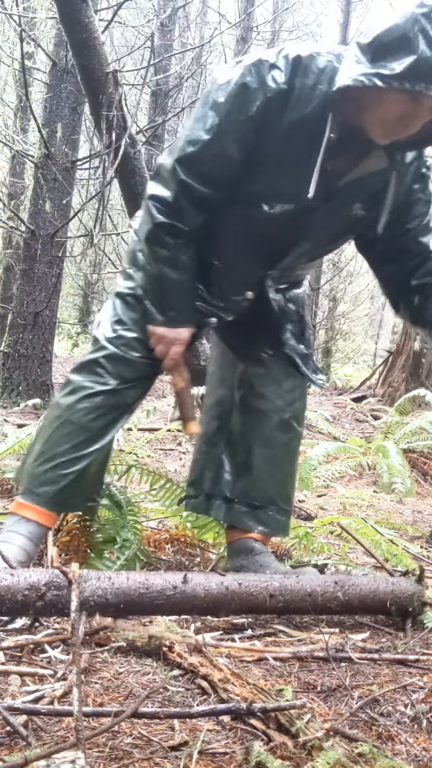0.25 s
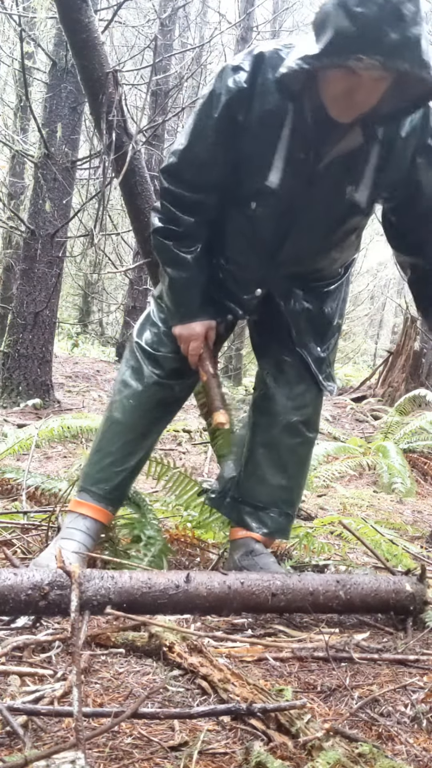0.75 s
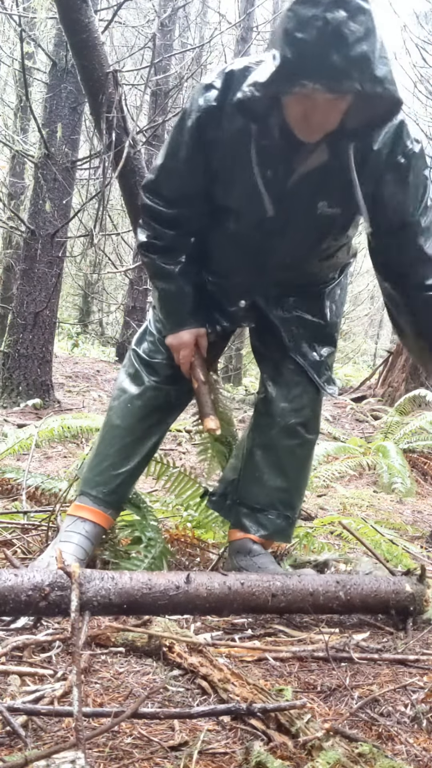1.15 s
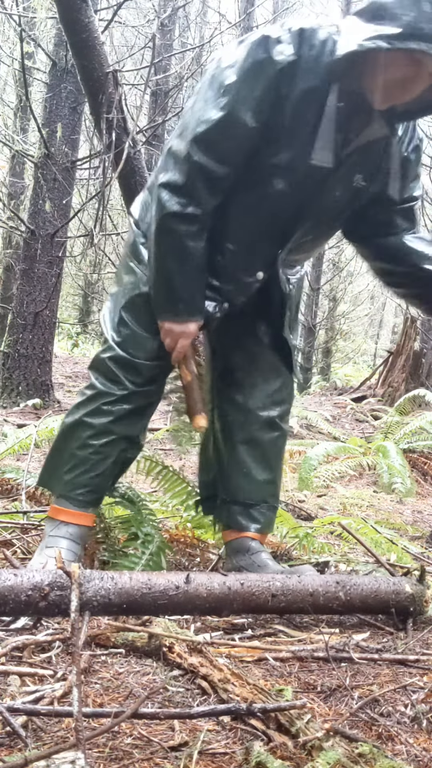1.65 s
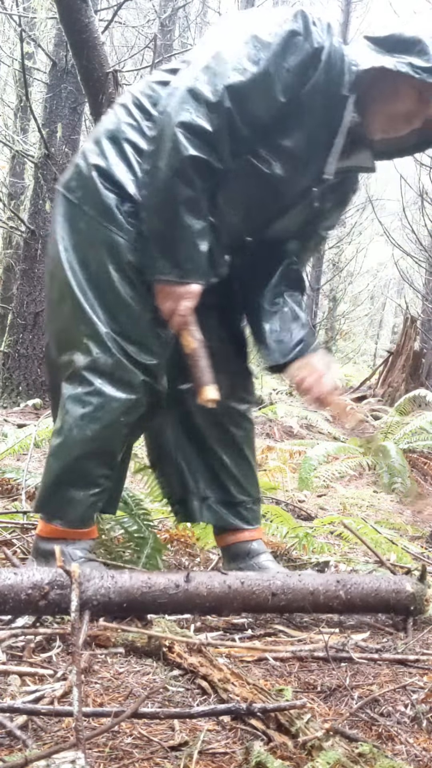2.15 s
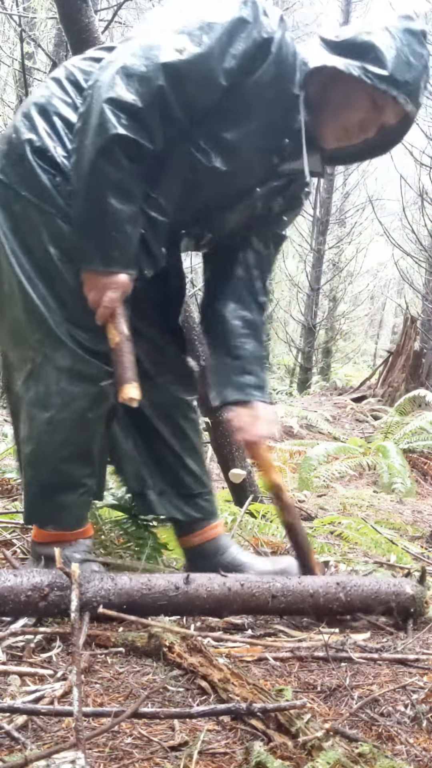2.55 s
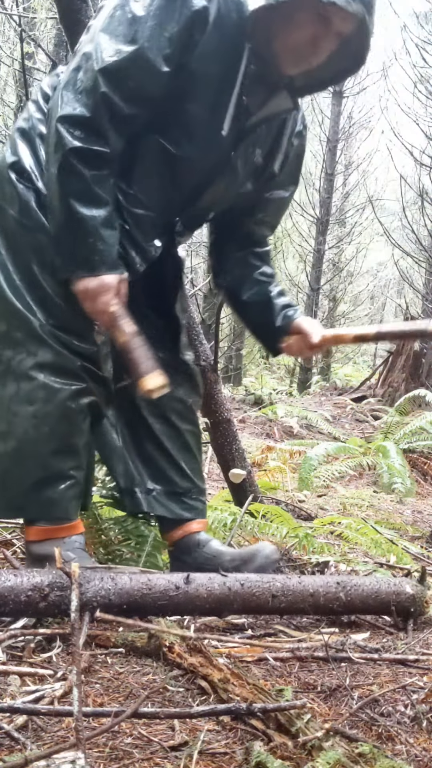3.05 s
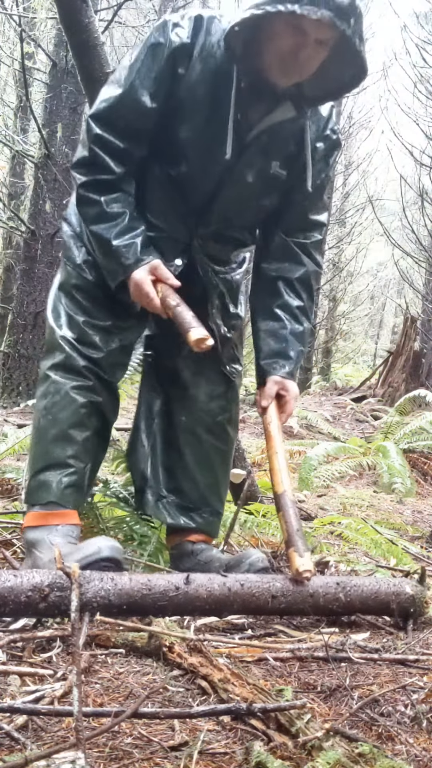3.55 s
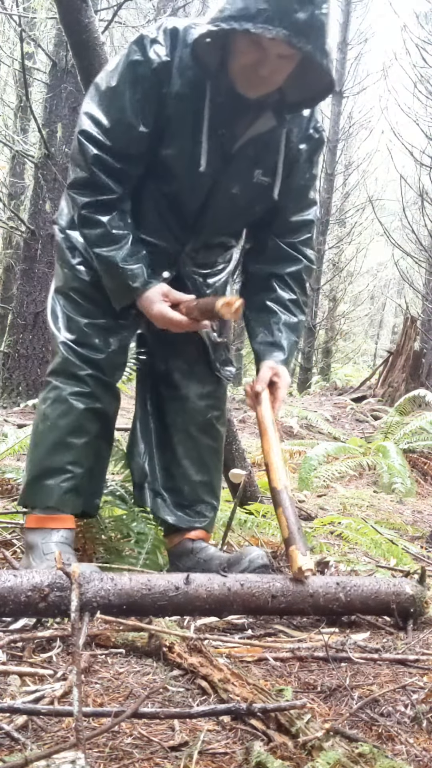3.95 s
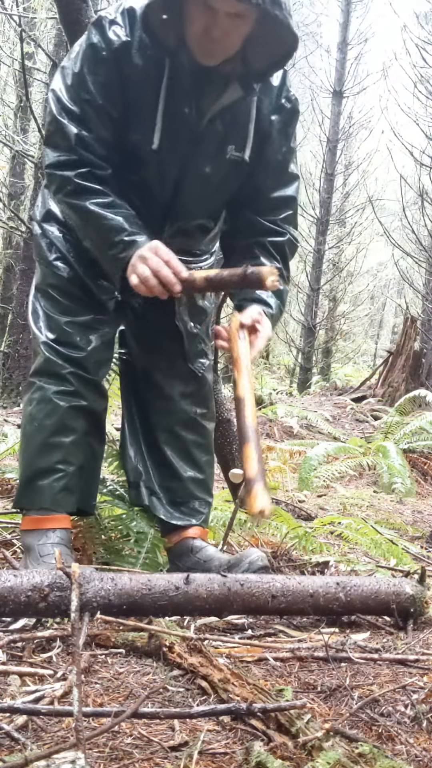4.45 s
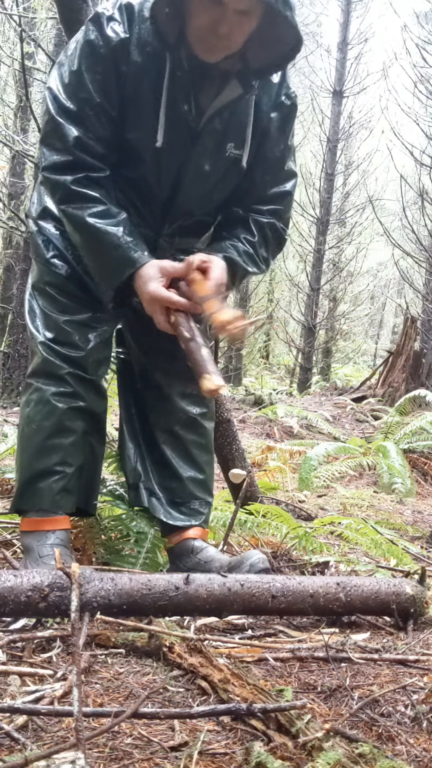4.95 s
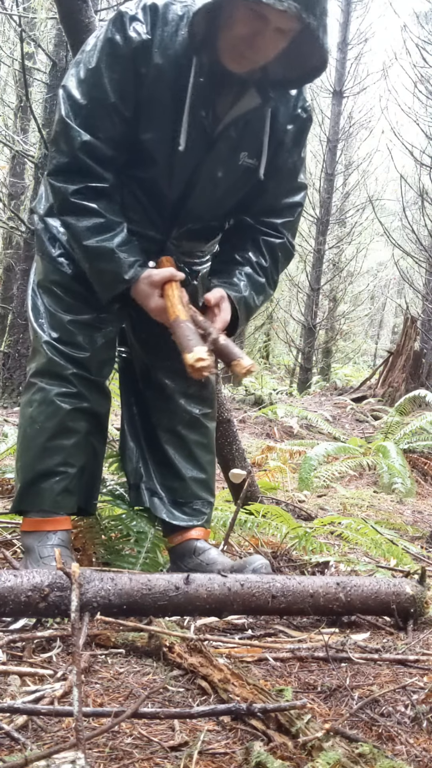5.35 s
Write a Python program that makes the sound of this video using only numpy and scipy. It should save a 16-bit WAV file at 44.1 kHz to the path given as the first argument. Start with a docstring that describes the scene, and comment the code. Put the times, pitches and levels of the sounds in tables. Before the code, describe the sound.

Six wood-on-wood hits, dry and abrupt, with gritty bark crunch, a low thud and a very short hollow ring. The third and fifth are brightest, the fourth duller, the last faint. Between and after them come waterproof fabric rustle, needle litter, twig clicks and small stick bumps over a barely audible low hush. Close outdoor stereo, the right side muffled.

```python
"""In a quiet forest a wooden baton strikes a fallen log: it touches, slams and rebounds.
Noise bursts give the bark crunch, knock and ground thud; damped modes ring the stick and the hollow log.
A rain jacket and needle litter rustle as shaped noise, twigs tick, and boots and sticks bump softly.
The trunks scatter a faint tail, swings shove air at the microphone, and a low hush lies underneath.
The right microphone port is muffled, so nearly all the treble sits on the left."""
import sys
import numpy as np
from scipy import signal
from scipy.fft import rfft, irfft, next_fast_len
from scipy.io import wavfile
from scipy.ndimage import map_coordinates

SR = 44100
rng = np.random.default_rng(int(sys.argv[2]) if len(sys.argv) > 2 else 0)


def store_wav(level_fs):
    """Save 16-bit WAV to argv[1]."""
    pcm = np.round(np.clip(np.atleast_2d(level_fs), -1, 1) * 32767)
    wavfile.write(sys.argv[1], SR, pcm.T.astype(np.int16))


N = 246519  # samples

# Blows on the log: [t/s, place along the log/0-1, ring level/dB, ground thud level/dB, knock level/dB,
#   knock centre f/Hz, bark crunch level/dB, t until the bark gives way/s, crush t/s, crunch tilt/dB per octave,
#   first touch level/dB against the slam, rebound level/dB against the slam]
BLOWS = [(0.0508, .498, -13.5, -36, -11.5, 820, -16, .0006, 0.0043, -0.8, -33, -24.5),
         (0.6454, .318, -17, -28, -16, 930, -14.5, .0025, 0.0029, 5.5, -15, -17),
         (1.2092, .26, -17, -28.5, -6.5, 1200, -11, .0006, 0.0032, 1.35, -7, -33.5),
         (2.1836, .322, -23.5, -26, -25, 483, -27, .0001, 0.0019, -3.5, 1, -37),
         (2.6681, .486, -23.5, -25, -25, 2400, -7.5, 0.00014, .0031, -0.53, 0.5, -36),
         (3.616, .236, -20.5, -39.5, -34.5, 566, -34.5, 0.00035, 0.0019, -3, -28, -28)]
# The hand-held baton's modes: [f/Hz, relative level/dB, t60/s]
BATON_MODES = [(709, -1, .055), (782, -6, .04), (977, 5, 0.03), (970, -1, 0.014), (1424, -5, 0.03),
               (1760, -3, 0.03), (2620, 1, 0.015), (2957, 3, .045), (3114, 2, 0.045)]
# Colour of the crunching bark before each blow's tilt: [f/Hz, relative level/dB per Hz]
BARK_COLOUR = [(200, -21), (1200, -1.5), (1800, -1), (3000, 0.5), (4200, 0.5), (5000, -5.5), (6000, -1),
               (8000, -3), (10000, -1.5), (13000, -3.5), (16000, -8.5)]
# The log's bending modes: [f/Hz, relative level/dB, t60/s]
LOG_MODES = [(235, -15, 0.23), (323.7, -7, .18), (440.7, 2, 0.13), (569, -10.5, 0.1), (698, 2, 0.079),
             (808, -14.5, 0.087), (990, -15, 0.0077)]
# How long the far trunks answer: [f/Hz, t60/s]
FOREST_DECAY = [(150, 0.37), (600, 0.12), (1500, 0.35), (3500, 0.58), (8000, 0.58), (16000, 1)]
# How busily the body moves, driving jacket, litter and faint snaps: [t/s, relative level/dB]
MOTION = [(0.0, -64.5), (1.73, -66.5), (2.05, -65), (2.63, -65.5), (2.8, -64.5), (3.41, -67), (5.59, -70)]
# Arm swings and steps, each a swell of rustle: [t at the top/s, length/s, jacket level/dB, needle litter level/dB]
SWELLS = [(0.67, 0.16, -57.5, -59), (1.983, 0.052, -56.5, -58), (2.09, 0.055, -49, -50.5),
          (2.808, 0.25, -53, -70), (3.189, 0.087, -57.5, -78), (3.98, 0.31, -61, -65.5)]
# Colour of the jacket: [f/Hz, relative level/dB per Hz]
JACKET_COLOUR = [(530, -30.5), (900, -4.5), (1200, -16.5), (1470, -4.5), (2020, -5), (4150, 0.5),
                 (4920, -5), (5750, 0), (8450, -7), (9420, -3.5), (12900, -4.5), (15100, -3), (16000, -11)]
# Colour of boots in needle litter: [f/Hz, relative level/dB per Hz]
LITTER_COLOUR = [(100, -4), (200, -4), (380, -1), (600, -5.5), (900, -15), (1400, -24.5), (3000, -35)]
# The clearest snaps of twigs and jacket creases:
#   [t/s, level/dB, relative body level/dB at 600-2200 Hz, sizzle setting/dB for the top treble]
CLEAR_TICKS = [(0.1945, -39, -22, -2), (0.3257, -49, -8, -1), (0.7103, -40, 0, -5), (0.9402, -40, -4, 1),
               (1.3712, -44, -12, 0), (1.603, -43, -6, 1), (1.952, -40.5, 0, 1), (2.0076, -37, -3, 4),
               (2.0388, -22.5, -5, 2), (2.1193, -39, -10, 5), (2.3854, -43, -6, 3), (3.2745, -43, -14, -9),
               (3.4031, -31, -14, 2), (3.6565, -40, -8, 3), (4.4146, -31.5, -22, -12), (4.6268, -46, -6, 1),
               (4.9172, -37.5, -6, 6), (5.0764, -46.5, -8, 5)]
# Boots and sticks bump: [t/s, level/dB, centre f/Hz]
BUMPS = [(0.974, -49, 94), (1.610, -43.5, 140), (1.931, -44.5, 392), (2.092, -43.5, 377),
         (2.107, -38.5, 280), (2.322, -46.5, 203), (3.121, -49, 298), (3.311, -51.5, 560),
         (3.403, -49, 550), (3.711, -45, 1760), (4.171, -40, 140), (4.194, -39.5, 502), (4.325, -50, 790),
         (4.338, -50.5, 111), (4.784, -40, 746), (4.826, -47.5, 1050)]
# Swings shove air at the microphone: [t/s, level/dB, sway f/Hz]
AIR_PUSHES = [(1.211, -26.5, 4), (1.572, -46, 5.9), (2.667, -14.5, 5.2), (3.313, -36, 5.2)]
# Colour of the still air: [f/Hz, relative level/dB per Hz]
AIR_COLOUR = [(20, -1.5), (45, -0.5), (90, -0.5), (135, -5), (200, -17), (500, -18), (1200, -28),
              (4000, -28.5), (9000, -40), (16000, -42.5)]
# The microphone housing cancels a narrow band: [f/Hz, level/dB]
HOUSING = [(900, -1), (1020, -6.5), (1200, -8.5), (1380, -2), (16000, -0.5)]
# The right port resonates near 1.2 kHz and is dull above: [f/Hz, level/dB against the left, phase lead/rad]
RIGHT_PORT = [(40, -2, 0), (150, -2, .9), (250, -4.5, 1.1), (450, -8, 1.55), (700, -6, 1), (1050, -2, .2),
              (1250, -2.5, -1.4), (1500, -4, -1.5), (2000, -14, -1.3), (3000, -20, -2), (4200, -26, -1.6),
              (6000, -33, -2), (9000, -48, -2), (16000, -53, -2)]

TOUCH_LEAD_S, TOUCH_HOLD_S = 0.003, .0015  # the bark is met just before the wood
REBOUND_S = .0156  # the baton hops once
# the soil goes on shaking after each blow, at SOIL_DB for the usual thud
SOIL_DELAY_S, SOIL_HZ, SOIL_T60_S = .045, 68, 0.5
SOIL_DB, SOIL_GROWS, USUAL_THUD_DB = -46.5, 0.8, -28  # grows in dB for each dB of thud above the usual
BUMP_CYCLES = 10.4  # t60 of a bump in cycles of its centre, so the low ones last longest
FAINT_BODY_DB, FAINT_SIZZLE_DB = -8, 0.5  # the colour that the lesser snaps share
FAINT_TICK_DB, FAINT_SPREAD_DB = 12.5, 2  # lesser snaps: level over the motion, random spread
CREASE_DB = 6  # level of a crease over a swing's jacket rustle
TOP_HZ = 16000  # band limit


def amp(db):
    """Decibels to amplitude."""
    return 10 ** (np.asarray(db) / 20)


def unit(x):
    """Scale a sound to rms 1."""
    return x / np.sqrt(np.mean(x ** 2) + 1e-20)


def along(points, hz):
    """Read a curve of (Hz, value) points on a log frequency axis."""
    f, v = np.transpose(points)
    return np.interp(np.log(hz + 1), np.log(f + 1), v)


def curve(rows):
    """Draw an automation line, one value per sample, through (s, value) rows."""
    return np.interp(np.arange(N) / SR, *np.transpose(rows))


def wobble(rate, size=N):
    """A smooth random curve, rate knots a second."""
    knots = rng.standard_normal(int(size * rate / SR) + 4)
    return map_coordinates(knots, [np.arange(size) * rate / SR])


def filtered(x, response):
    """Shape the spectrum of x by a response of frequency."""
    n = x.shape[-1]
    padded = next_fast_len(n + SR // 4)
    spectrum = rfft(x, padded) * response(np.fft.rfftfreq(padded, 1 / SR))
    return irfft(spectrum, padded)[..., :n]


def noise(colour_db, size):
    """Noise of rms 1 whose spectrum in dB is a function of frequency."""
    return unit(filtered(rng.standard_normal(size), lambda hz: amp(colour_db(hz))))


def hump(centre_hz, steep_db):
    """A broad resonance: the level falls with the square of the distance in octaves."""
    return lambda hz: -steep_db * np.log2((hz + 1) / centre_hz) ** 2


def burst(carrier, rise, hold, t60):
    """The carrier swells, holds and dies (times in s); its energy is set by the envelope alone."""
    t = np.arange(len(carrier)) / SR
    fade = amp(-60 * np.maximum(t - hold, 0) / t60)
    envelope = (1 - np.exp(-(t / rise) ** 2)) * fade
    return unit(carrier * envelope) * np.sqrt(np.mean(envelope ** 2))


def ringing(hz, db, t60, rise):
    """Damped modes of struck wood, each starting at its own random phase."""
    t = np.arange(SR // 2) / SR
    decay = amp(db[:, None] - 60 * t / t60[:, None])
    phase = 2 * np.pi * (hz[:, None] * t + rng.random((len(hz), 1)))
    modes = decay * np.sin(phase)
    return modes.sum(0) * (1 - np.exp(-t / rise))


def add(track, s, sound):
    """Mix a sound into the track at time s."""
    part = track[max(round(s * SR), 0):][:len(sound)]
    part += sound[:len(part)]


def baton(grain_db=0.5, pivot_hz=6000, clack_db=-3, modes_db=-4, light_tilt_db=-1.0):
    """Touch, slam and rebound: the baton knocks while the bark under it gives way in a dense crunch."""
    out, size = np.zeros(N), SR // 4
    hz, db, t60 = np.transpose(BATON_MODES)
    for s, _, _, _, knock_db, knock_hz, crunch_db, give, crush, tilt, touch_db, rebound_db in BLOWS:
        # the knock centre picks which modes speak
        drive = hump(knock_hz, steep_db=3.5)
        # lighter contacts only scuff the bark, at once and more dully
        light_tilt = tilt + light_tilt_db
        contacts = [(s - TOUCH_LEAD_S, touch_db, 0, TOUCH_HOLD_S, light_tilt),
                    (s, 0, give, crush, tilt),
                    (s + REBOUND_S, rebound_db, 0, crush, light_tilt)]
        for at, force_db, lag, hold, slope in contacts:
            stick_ring = ringing(hz, db + drive(hz), t60, rise=.0006)
            add(out, at, amp(force_db + knock_db + modes_db) * stick_ring)
            clack = burst(noise(drive, size), rise=0.0015, hold=hold, t60=0.021)
            add(out, at, amp(force_db + knock_db + clack_db) * clack)
            bark = noise(lambda f: along(BARK_COLOUR, f) + slope * np.log2((f + 100) / pivot_hz), size)
            fibres = amp(grain_db * wobble(1800, size))
            crunch = burst(bark * fibres, rise=0.0001, hold=hold, t60=0.024)
            add(out, at + lag, amp(force_db + crunch_db) * crunch)
    return out


def log_blows(first_order=5):
    """The log rings hollow; a mode with a node near the struck place stays weak."""
    out = np.zeros(N)
    hz, db, t60 = np.transpose(LOG_MODES)
    half_waves = first_order + np.arange(len(LOG_MODES)) + .5
    for s, place, ring_db, thud_db, *_ in BLOWS:
        mode_shape = np.cos(np.pi * half_waves * place + np.pi / 4)
        shape_db = 10 * np.log10(mode_shape ** 2 + .08)
        add(out, s, amp(ring_db) * ringing(hz, db + shape_db, t60, rise=0.004))
        # the ground under the log takes a dull share of the blow, then shakes on
        ground = noise(hump(centre_hz=232, steep_db=3.5), SR // 2)
        add(out, s, amp(thud_db) * burst(ground, rise=0.003, hold=0.004, t60=0.085))
        soil = noise(hump(SOIL_HZ, steep_db=10.5), SR // 2)
        soil_db = SOIL_DB + SOIL_GROWS * (thud_db - USUAL_THUD_DB)
        add(out, s + SOIL_DELAY_S, amp(soil_db) * burst(soil, rise=.007, hold=.0025, t60=SOIL_T60_S))
    return out


def forest(x, near_db=-17, near_t60=0.11, far_db=-22, far_rise=0.0065, block_size=13230):
    """Ground and near trunks scatter at once; farther trunks answer in a thin tail, redrawn every block."""
    out = np.zeros(N)
    onset = 1 - np.exp(-np.arange(SR // 2) / SR / far_rise)
    for start in range(0, N, block_size):
        # the far tail is noise that fades at its own pace in each band
        hz, t, bands = signal.stft(rng.standard_normal(SR // 2), SR, nperseg=256)
        fade = amp(-60 * t / along(FOREST_DECAY, hz)[:, None])
        far = signal.istft(bands * fade, SR, nperseg=256)[1][:SR // 2] * onset
        scatter = noise(lambda f: along([(300, -14), (1500, -1.5), (16000, 6.5)], f), SR // 2)
        near = burst(scatter, rise=0.0032, hold=0.0098, t60=near_t60)
        answer = amp(near_db) * near / np.linalg.norm(near) + amp(far_db) * far / np.linalg.norm(far)
        add(out, start / SR, signal.fftconvolve(x[start:start + block_size], answer))
    return out


def echoes(count=3):
    """The crack leaves in several directions, each with its own fine grain and its own trunks to meet."""
    return sum(forest(baton()) for _ in range(count)) / np.sqrt(count)


def rustle(jacket_db=6, litter_db=3, crinkle_db=2.0):
    """The jacket slides and crinkles while boots shift in needle litter; both swell with each swing or step."""
    crinkle = amp(crinkle_db * wobble(430) + 0.66 * wobble(25))
    cloth = noise(lambda hz: along(JACKET_COLOUR, hz), N) * crinkle
    needles = noise(lambda hz: along(LITTER_COLOUR, hz), N) * amp(1.8 * wobble(30))
    t, motion_db = np.arange(N) / SR, curve(MOTION)
    jacket = amp(motion_db + jacket_db)
    litter = amp(motion_db + litter_db)
    for s, length, swing_db, step_db in SWELLS:
        swell = np.exp(-2 * ((t - s) / length) ** 2)
        # levels add as powers
        jacket = np.hypot(jacket, amp(swing_db) * swell)
        litter = np.hypot(litter, amp(step_db) * swell)
    return jacket * unit(cloth) + litter * unit(needles)


def ticks(count=24):
    """Tiny dry snaps of coloured noise: clear ones, faint strays that follow the motion, creases in the swings."""
    out = np.zeros(N)
    times = rng.uniform(0, N / SR, count)
    strays = zip(times, np.interp(times, *np.transpose(MOTION)) + FAINT_TICK_DB)
    creases = [(s + length * rng.uniform(-1, 1), db + CREASE_DB)
               for s, length, db, _ in SWELLS for _ in range(3)]
    faint = [(s, db + FAINT_SPREAD_DB * rng.standard_normal(), FAINT_BODY_DB, FAINT_SIZZLE_DB)
             for s, db in [*strays, *creases]]
    for s, db, body, sizzle in CLEAR_TICKS + faint:
        colour = [(150, -19.0), (600, body), (2200, body), (3700, -3.5), (6500, -5),
                  (10000, sizzle - 3), (16000, sizzle - 5)]
        snap = noise(lambda hz: along(colour, hz), SR // 10)
        add(out, s, amp(db) * burst(snap, rise=.0003, hold=.0012, t60=.013))
    return out


def bumps(steep_db=8.0):
    """Soft contacts that hardly ring: short bursts of noise around one pitch."""
    out = np.zeros(N)
    for s, db, hz in BUMPS:
        thump = noise(hump(hz, steep_db), SR // 2)
        add(out, s, amp(db) * burst(thump, rise=.5 / hz, hold=0.0022, t60=BUMP_CYCLES / hz))
    return out


def air_pushes(life=0.05, rise=0.0039):
    """Each shove of air is one slow, damped swell of pressure."""
    out, t = np.zeros(N), np.arange(SR) / SR
    for s, db, sway_hz in AIR_PUSHES:
        envelope = np.exp(-t / life) * (1 - np.exp(-t / rise))
        add(out, s, amp(db) * np.cos(2 * np.pi * sway_hz * t) * envelope)
    return out


def still_air(air_db=-71):
    """A faint low hush of noise, partly shared by both ports."""
    shared, left, right = [noise(lambda hz: along(AIR_COLOUR, hz), N) for _ in range(3)]
    return amp(air_db) * unit(shared + np.array([left, right]))


def scene():
    """Everything near reaches both ports, the right one muffled; the hush lies under both."""
    contacts = log_blows() + baton() + echoes() + ticks() + bumps()
    housed = filtered(contacts, lambda hz: amp(along(HOUSING, hz)))
    left = housed + rustle() + air_pushes()
    port = np.array(RIGHT_PORT)
    level, phase = port[:, :2], port[:, ::2]
    right = filtered(left, lambda hz: amp(along(level, hz)) * np.exp(1j * along(phase, hz)))
    return np.array([left, right]) + still_air()


def record(dry):
    """The hardest peaks are rounded off, then a steep filter cuts what lies above the band limit."""
    ceiling, hardness = .8, 4
    rounded = dry / (1 + np.abs(dry / ceiling) ** hardness) ** (1 / hardness)
    return filtered(rounded, lambda hz: 1 / (1 + (hz / TOP_HZ) ** 120))


dry = scene()
out = record(dry)
store_wav(out)
```